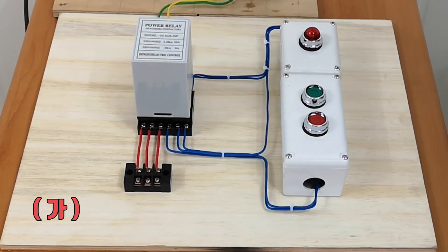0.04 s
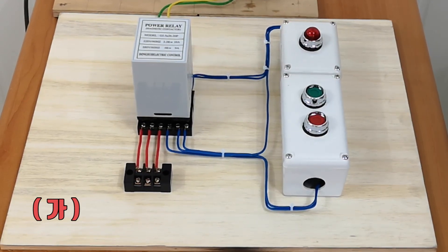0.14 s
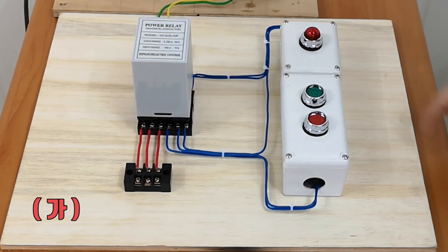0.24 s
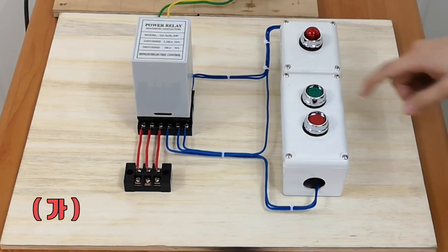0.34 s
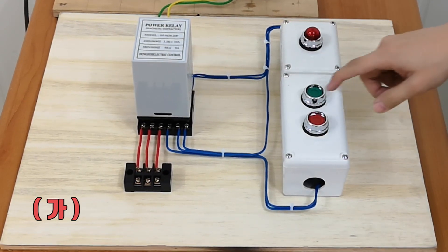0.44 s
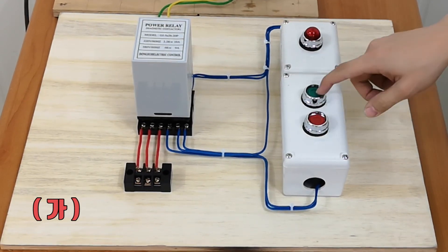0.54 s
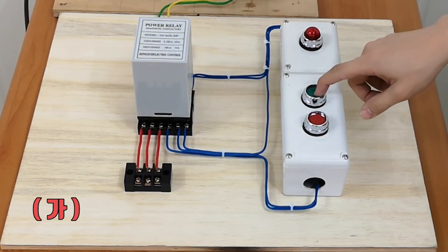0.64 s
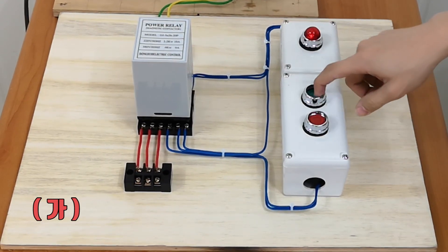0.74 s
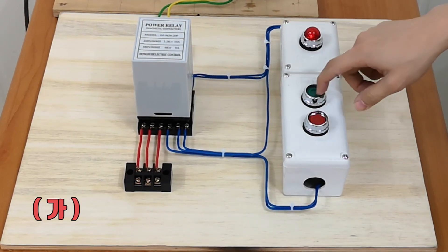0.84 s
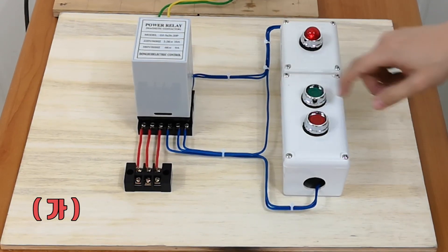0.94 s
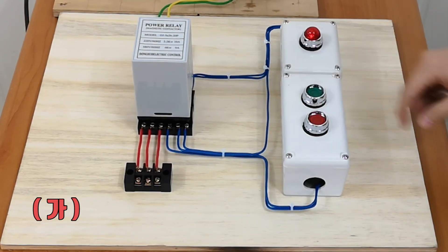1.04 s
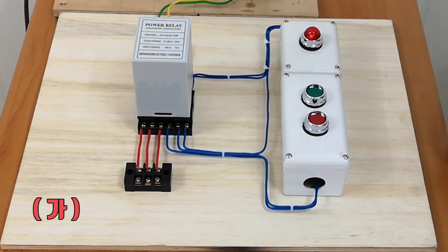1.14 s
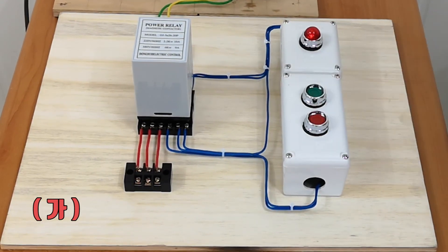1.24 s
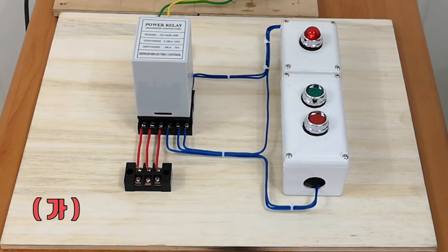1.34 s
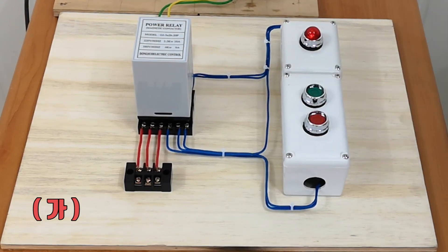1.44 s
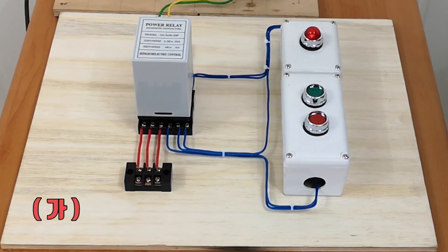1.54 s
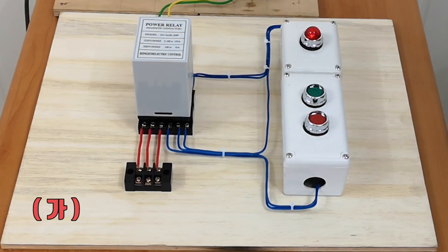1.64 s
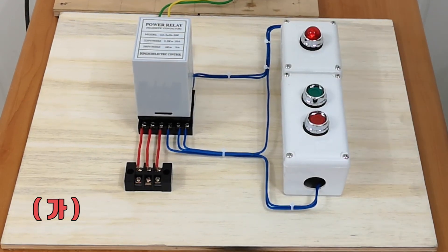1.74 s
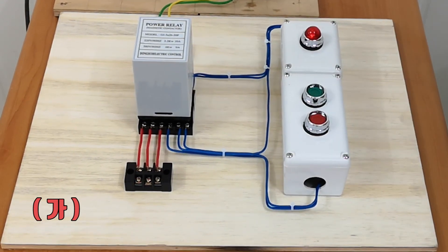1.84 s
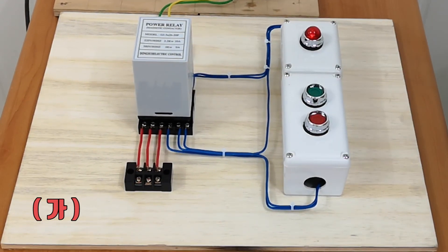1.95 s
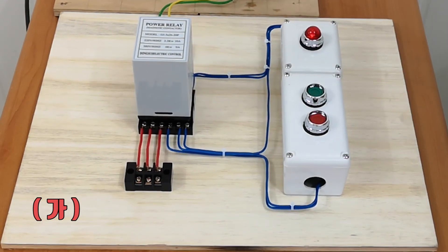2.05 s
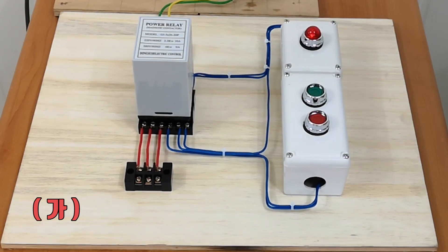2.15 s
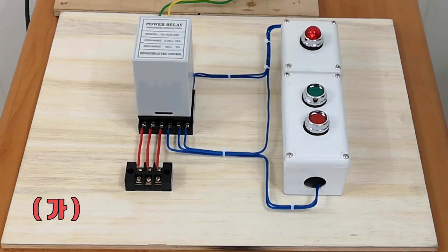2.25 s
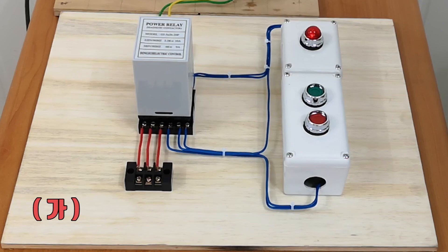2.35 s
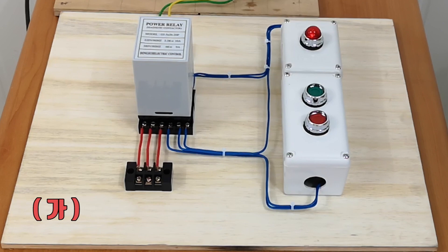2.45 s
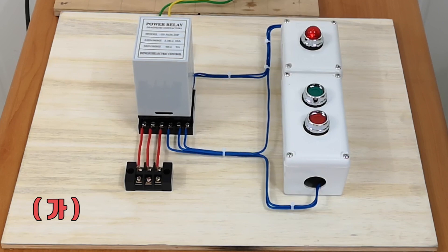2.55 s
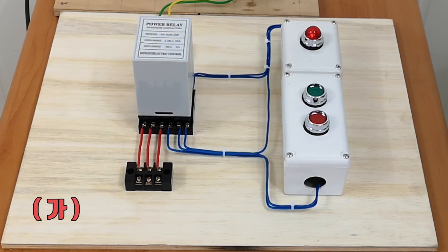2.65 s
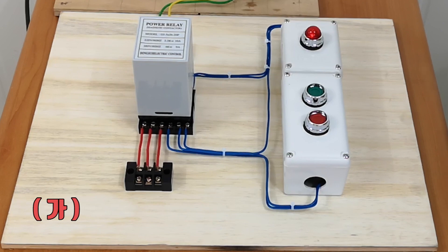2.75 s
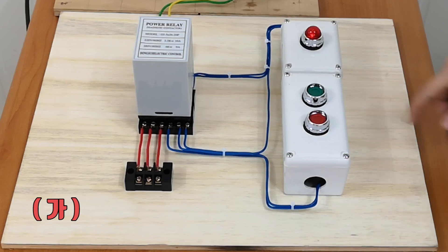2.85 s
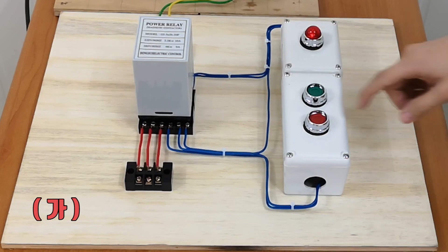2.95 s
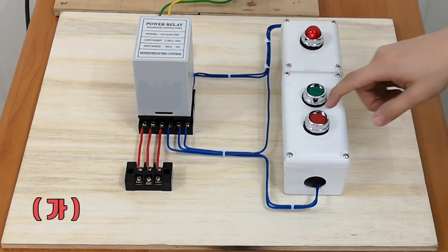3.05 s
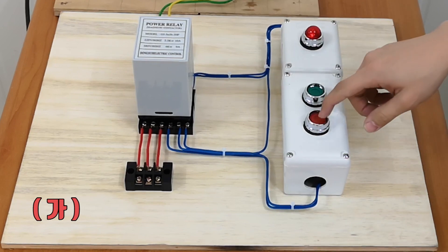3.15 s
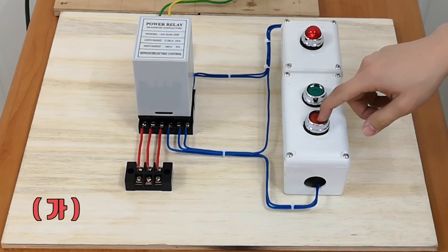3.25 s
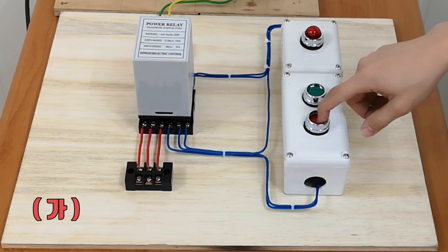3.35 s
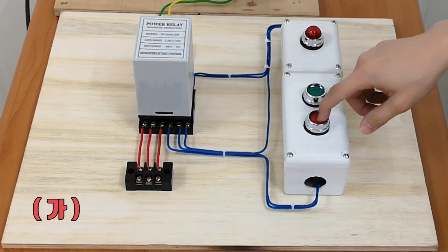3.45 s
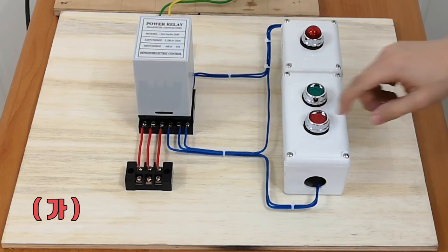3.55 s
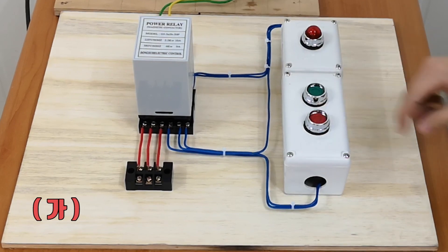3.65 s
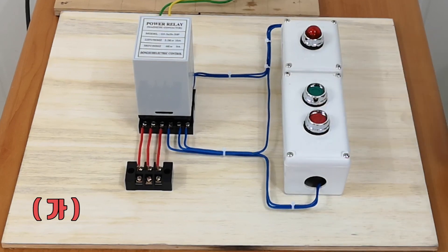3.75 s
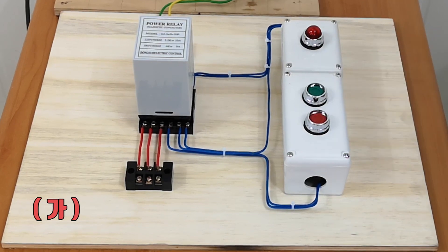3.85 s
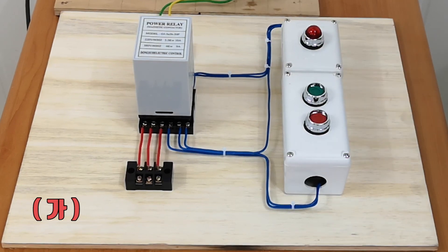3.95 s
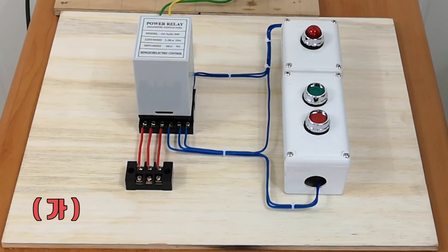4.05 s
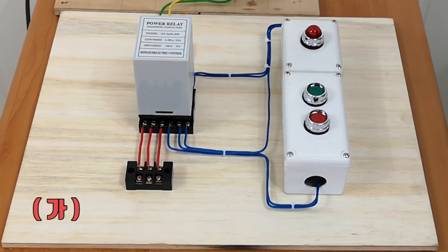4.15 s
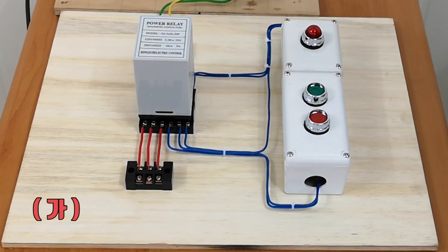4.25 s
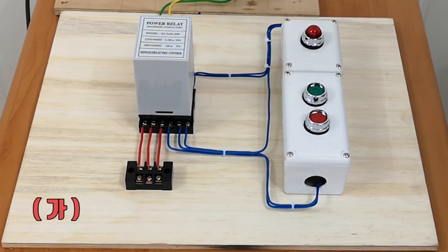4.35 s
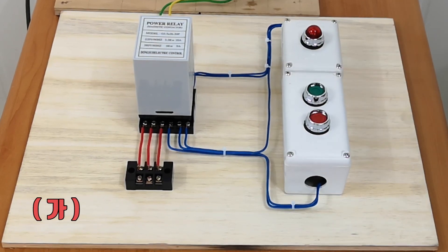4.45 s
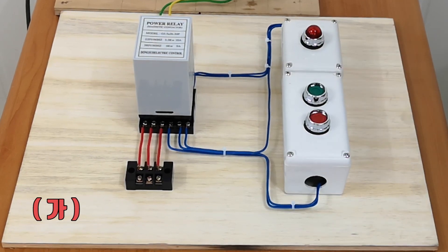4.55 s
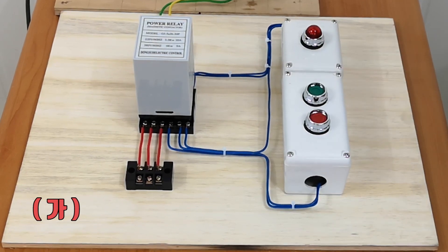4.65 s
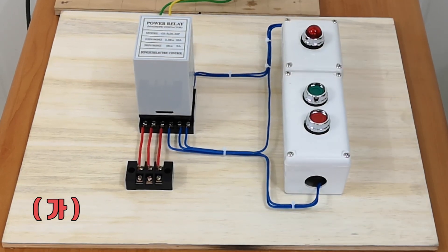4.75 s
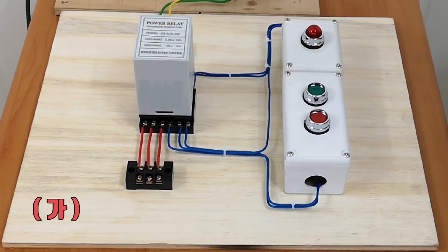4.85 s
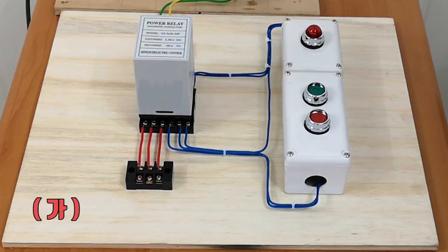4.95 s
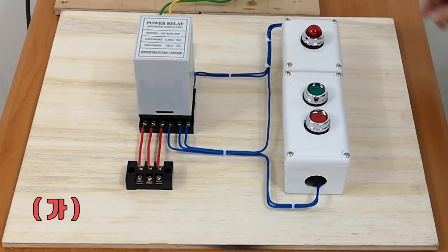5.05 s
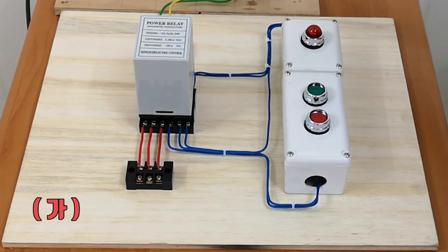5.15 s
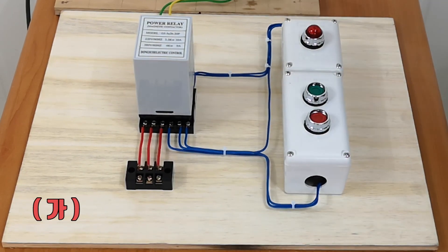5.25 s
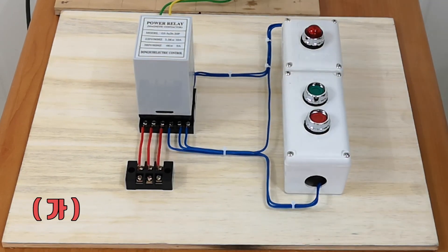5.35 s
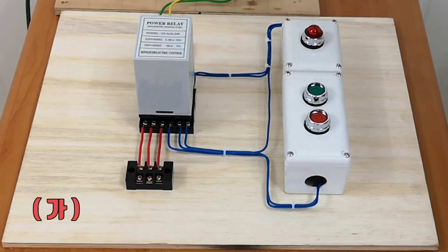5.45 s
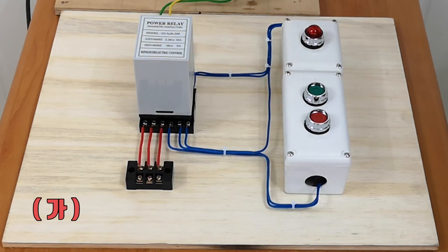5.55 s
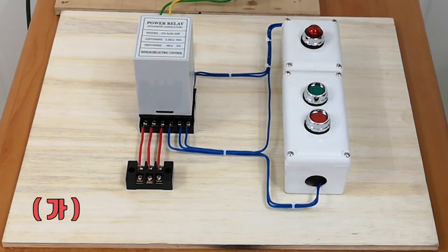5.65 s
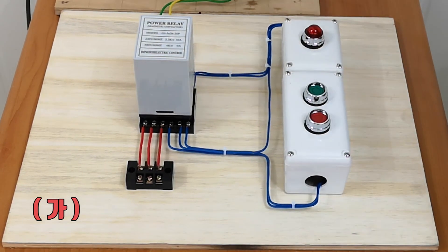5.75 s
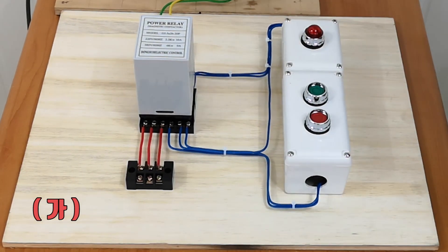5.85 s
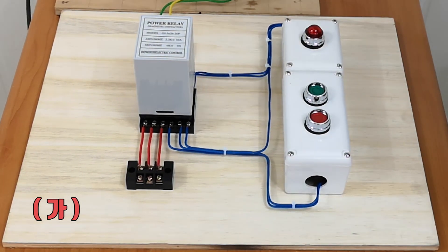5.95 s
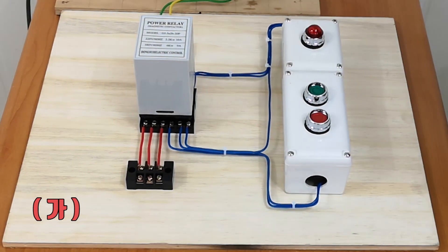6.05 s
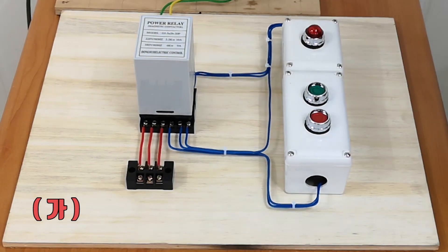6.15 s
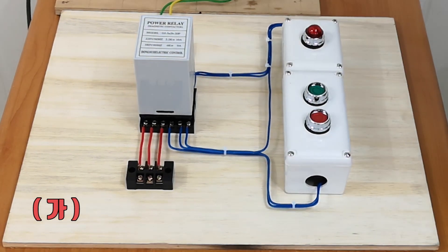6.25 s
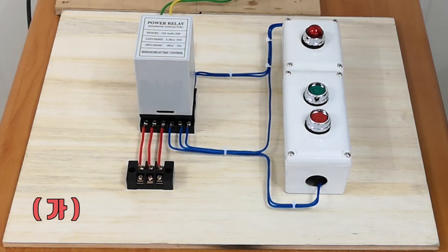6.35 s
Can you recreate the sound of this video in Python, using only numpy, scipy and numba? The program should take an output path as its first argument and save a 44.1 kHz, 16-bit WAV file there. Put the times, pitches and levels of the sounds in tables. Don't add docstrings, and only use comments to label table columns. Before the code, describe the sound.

Sharp relay clacks and springy button snaps on a wooden board in a bare echoing room, over very faint hum and air rumble.

```python
import sys
import numpy as np
from scipy import signal
from scipy.fft import rfft, irfft, next_fast_len
from scipy.io import wavfile
from scipy.ndimage import uniform_filter1d
from numba import njit

SR = 44100
rng = np.random.default_rng(int(sys.argv[2]) if len(sys.argv) > 2 else 0)


def voltage_ratio(decibels):
    exponent = np.asarray(decibels, float) / 20
    return 10 ** exponent


def master_out(mix):
    frames = np.transpose(np.atleast_2d(mix))
    ceiling = np.clip(frames, -1, 1)
    pcm = np.round(ceiling * 32767).astype(np.int16)
    wavfile.write(sys.argv[1], SR, pcm)


N = 282274

# start_s, board_db, case_db, metal_db, rattle_ms
PULL_IN = [
    (.8480, -16, -21, -25, 8.2),
    (.8540, -22, -24, -46, 7),
]


def armature_blows():
    # start_s, board_db, case_db, metal_db, rattle_ms
    drop_out = [
        (3.4, -40, -37, -44, 5),
        (3.4077, -33, -19.5, -32.5, 4),
        (3.4127, -35.5, -22.5, -30.5, 5.6),
        (3.422, -28.5, -27.5, -31.5, 9.3),
        (3.443, -48, -24, -38, 6),
    ]
    thin_db = 4
    rows = []
    for table, centre_hz in ((PULL_IN, 1160), (drop_out, 2055)):
        rows += [(*row, centre_hz, thin_db) for row in table]
    return rows


def light_contacts():
    # start_s, case_db, metal_db
    finger = [
        (.710, -58.5, -60.5),
        (0.7213, -53.5, -45),
        (.735, -56, -58.5),
        (.766, -60.5, -43),
        (0.7863, -56, -38),
        (0.804, -40, -52),
        (3.3735, -48.5, -38),
        (3.391, -48, -41),
    ]
    # start_s, case_db, metal_db
    travel = [
        (0.819, -48, -42),
        (0.8239, -28.5, -34),
        (.836, -27, -51),
    ]
    # start_s, case_db, metal_db
    snap = [
        (.932, -52.5, -24),
        (.9420, -32, -18.5),
        (3.5724, -48.5, -24),
        (3.58, -41, -18.5),
    ]
    # start_s, case_db, metal_db
    stop = [
        (.945, -26, -29.5),
        (3.585, -26, -16.5),
        (3.591, -40, -28.5),
        (3.602, -29.5, -51.5),
    ]
    # start_s, case_db, metal_db
    switch = [
        (6.3505, -38.5, -35),
        (6.3547, -23.5, -28),
        (6.3595, -24, -19),
        (6.365, -32, -27),
    ]
    # board minus case dB, rattle ms, centre of the clack Hz, metal thinning dB per octave squared
    kinds = ((finger, -18.5, 4.5, 1700, 3.5),
             (travel, -15.5, 8, 1200, -3),
             (snap, -7.5, 4, 2550, 2.5),
             (stop, -13.5, 6, 1700, 1.6),
             (switch, -33.5, 2.5, 2003, 8.5))
    rows = []
    for table, thud_db, rattle_ms, centre_hz, thin_db in kinds:
        for start_s, case_db, metal_db in table:
            rows.append((start_s, case_db + thud_db, case_db, metal_db, rattle_ms, centre_hz, thin_db))
    return rows


def blow(board_db, case_db, metal_db, rattle_ms, centre_hz, thin_db=0):
    # mode_hz, level_db, t60_s
    board = [(99, -16.5, .1), (160, 2, 0.041), (194, 2.5, 0.056), (270.5, -11, 0.031), (306.3, 0, 0.06),
             (445.2, -14.5, 0.037), (643.7, -16, 0.072)]
    # mode_hz, level_db, t60_s
    case = [(690, -11.5, 0.084), (897, -10.5, 0.12), (1030, -0.5, 0.011), (1282, -1.5, 0.019),
            (1420, 2, 0.011), (1630, -3.5, 0.018), (1800, -5.5, 0.035), (1940, 1.5, 0.014),
            (2150, -3.5, 0.018), (2420, -4, 0.021), (2900, -7, 0.03), (3540, -6, 0.012), (3900, -8, 0.0046)]
    # mode_hz, level_db, t60_s
    metal = [(3460, -11, 0.0068), (3860, -9, 0.018), (4700, -7, 0.0072), (4980, -5, .005), (5665, 1, 0.003),
             (6260, -9.5, .005), (6943, -5, 0.0056), (7710, -3.5, 0.0085), (8300, -2, 0.004),
             (9050, -13, 0.0064), (9400, -1, 0.0085), (11360, -20, 0.0098), (10900, -18, .005),
             (13100, -16, 0.0029), (14100, -18.5, 0.0037)]
    thin_hz = 8500
    t = np.arange(1500) / SR
    struck = rng.random(len(t)) < .15
    hits = rng.standard_normal(len(t)) * struck * np.exp(-t * 1000 / max(rattle_ms, .3))
    hits[0] = 1.2
    thud = ring(board, .5, 0, centre_hz / 6, 4.4, flip=0, bend=0)
    thud = thud * (1 - np.exp(-np.arange(6000) / 7.3))
    thud = signal.sosfilt(signal.butter(2, 65, "high", fs=SR, output="sos"), thud)
    out = voltage_ratio(board_db) * thud[[0, 1, 0]] / np.abs(thud).max()
    bodies = ((case, case_db, .5, centre_hz, 4.0, 2.5),
              (metal, metal_db, .9, thin_hz, thin_db, -2.5))
    for modes, level_db, apart, hz, fall_db, wall_db in bodies:
        direct = signal.fftconvolve(ring(modes, 4.1, apart, hz, fall_db), hits[None])[:, :thud.shape[1]]
        walls = spread(modes, hz, fall_db)
        walls = walls * voltage_ratio(wall_db) * np.sqrt(np.mean(direct ** 2) / np.mean(walls ** 2))
        out = out + voltage_ratio(level_db) * np.vstack([direct, walls]) / np.abs(direct).max()
    return out


def ring(modes, scatter_db, apart, centre_hz=1000, fall_db=0, flip=np.pi, bend=0.0096):
    hz, level_db, t60_s = np.array(modes).T[:, :, None]
    t = np.arange(6000) / SR
    level_db = level_db + scatter_db * rng.standard_normal(hz.shape)
    gain = voltage_ratio(level_db - fall_db * np.log2(hz / centre_hz) ** 2)
    hz = hz * (1 + bend * rng.standard_normal(hz.shape))
    phase = apart * rng.standard_normal((2, len(modes), 1)) + flip * np.arange(len(modes))[:, None]
    decay = np.exp(-np.log(1000) * t / t60_s)
    return (gain * decay * np.sin(2 * np.pi * hz * t + phase)).sum(axis=1)


def spread(modes, centre_hz, fall_db, blur_hz=3.7):
    hz, level_db, t60_s = np.array(modes).T[:, :, None]
    f = np.fft.rfftfreq(6000, 1 / SR) + 1
    power = voltage_ratio(2 * (level_db - fall_db * np.log2(hz / centre_hz) ** 2))
    power = power * np.exp(-3.0 * np.log2(f / hz) ** 2)
    power = power / blur_hz / ((f - hz) ** 2 + (blur_hz / t60_s) ** 2)
    return np.roll(irfft(np.sqrt(power.sum(axis=0))), 180)


def core_ring():
    # mode_hz, level_db, t60_s
    core = [
        (920, -33.5, 0.05),
        (1118, -33, 0.0443),
    ]
    return ring(core, 0, .3)[[0, 1, 0]]


def spring_ping():
    # mode_hz, level_db, t60_s
    spring = [
        (1630, -53, 0.18),
        (5050, -48, 0.055),
        (5500, -54, 0.017),
    ]
    return ring(spring, 0, 0.27)


def box_knock():
    # mode_hz, level_db, t60_s
    box = [
        (309, -49, 0.45),
    ]
    return ring(box, 0, 0)[[0, 1, 0]]


def far_knocks():
    # start_s, level_db
    knocks = [
        (5.47, -53.5),
        (6.065, -55),
        (6.205, -63),
    ]
    track = np.zeros((3, N))
    for start_s, level_db in knocks:
        add(track, start_s, blow(level_db - 27, level_db, level_db - 9, 30.5, 2700))
    return track


def room(x):
    # band_hz, t60_s, level_db
    echo = [(60, 1, -12.5), (170, 1, -25), (460, 0.86, -13), (1500, 1.0, -21.5), (3102, 1, -23.5),
            (6100, 0.6, -17), (10100, 0.49, -24.5), (15200, 0.15, -13)]
    t = np.arange(SR) / SR
    onset = 1 - np.exp(-t / 0.0013)

    def decay(hz):
        return voltage_ratio(on_log(hz, echo, col=2) - 60 * t / on_log(hz, echo))

    tail = diffuse(SR, decay) * onset
    return 0.22 * signal.fftconvolve(tail, x[None])[:, :N]


def diffuse(size, band_gain):
    # band_hz, side_minus_mid_db
    side_db = [(60, -31), (110, -16.5), (200, -13), (380, 1.5), (700, 2.5), (1290, -1.5), (2380, -1),
               (4400, 0.5), (8120, 0.5), (15000, -0.5)]
    f = np.fft.rfftfreq(size, 1 / SR)
    mid, side = rfft(rng.standard_normal((2, size)))
    width_db = on_log(f, side_db)
    side = side * voltage_ratio(width_db)
    norm = np.sqrt(1 + voltage_ratio(2 * width_db))
    out = np.zeros((2, size))
    for hz in 20 * 2 ** (np.arange(20) / 2):
        octaves = np.log2(f / hz + 1e-9)
        bell = np.cos(np.pi * np.clip(octaves, -.5, .5)) ** 2
        out += band_gain(hz) * irfft(np.array([mid + side, mid - side]) * bell / norm, size)
    return out


def air():
    # band_hz, density_db (per Hz)
    spectrum = [(20, 1.5), (84, -5), (149, -15.5), (200, -19.5), (300, -25), (560, -33.5), (1050, -34.5),
                (2000, -33), (2800, -36.5), (4000, -41.5), (8000, -49), (11700, -54), (12100, -100.5)]
    size = next_fast_len(N)
    noise = diffuse(size, lambda hz: 1)
    colour = voltage_ratio(on_log(np.fft.rfftfreq(size, 1 / SR), spectrum))
    noise = irfft(rfft(noise) * colour, size)[:, :N] * voltage_ratio(0.52 * walk(2.9))
    return noise * voltage_ratio(-47.5) / np.sqrt(np.mean(noise ** 2))


def hum():
    # line_hz, rms_db, wobble_db
    lines = [(123.7, -63, 2.5), (235.2, -63.5, 0.8), (355, -77.5, 1), (474, -82, 1.5), (1010, -85, 5),
             (7822, -99, 3)]
    total = np.zeros(N)
    for hz, rms_db, wobble_db in lines:
        level = np.sqrt(2) * voltage_ratio(rms_db + wobble_db * walk(7.0))
        cycles = hz * np.cumsum(1 + 0.001243 * walk(1.3)) / SR
        total += level * np.sin(2 * np.pi * cycles)
    return total


def walk(rate_hz):
    k = int(SR / rate_hz)
    held = np.repeat(rng.standard_normal(N // k + 1), k)
    return 1.3 * uniform_filter1d(uniform_filter1d(held, k), k)[:N]


def on_log(hz, table, col=1):
    table = np.array(table)
    return np.interp(np.log(hz + 1), np.log(table[:, 0]), table[:, col])


def add(track, start_s, sound):
    i = int(start_s * SR)
    track[:, i:i + sound.shape[1]] += sound[:, :N - i]


def scene():
    near = np.zeros((3, N))
    for start_s, *strength in sorted(light_contacts() + armature_blows()):
        add(near, start_s, blow(*strength))
    add(near, PULL_IN[0][0], core_ring())
    add(near[:2], .7855, spring_ping())
    add(near, 6.356, box_knock())
    far = far_knocks()
    return near[:2] + room(near[2] + far[2]) + voltage_ratio(-2.0) * far[:2] + air() + hum()


@njit
def follow(x, fall):
    e, out = 1e-9, np.empty(len(x))
    for i in range(len(x)):
        e = x[i] if x[i] > e else e + (x[i] - e) * fall
        out[i] = e
    return out


def low_pass(x):
    return signal.sosfilt(signal.butter(12, 15840, fs=SR, output="sos"), x)


def record(dry):
    ports = []
    for channel, port_hz in zip(dry, (7450, 9500)):
        peak = signal.lfilter(*signal.iirpeak(port_hz, 5.0, SR), channel)
        ports.append(channel + (voltage_ratio(5) - 1) * peak)
    x = np.array(ports)
    knee_db, slope, depth_db, release_s = -41, 0.67, 9.5, 0.023
    heard = signal.sosfilt(signal.butter(2, 300, "high", fs=SR, output="sos"), x.mean(axis=0))
    loud = follow(np.sqrt(uniform_filter1d(heard ** 2, 220) + 1e-14), 1 / (release_s * SR))
    lost_db = np.clip(slope * (knee_db - 20 * np.log10(loud)), 0, depth_db)
    deep = signal.sosfiltfilt(signal.butter(2, 110, fs=SR, output="sos"), x)
    x = (x - deep) * voltage_ratio(-lost_db) + deep * voltage_ratio(-.4 * lost_db - 0.69 * depth_db)
    x = signal.sosfilt(signal.ellip(6, .5, 60, 15100, fs=SR, output="sos"), x)
    return low_pass(x)


dry = scene()
out = record(dry)
master_out(out)
```